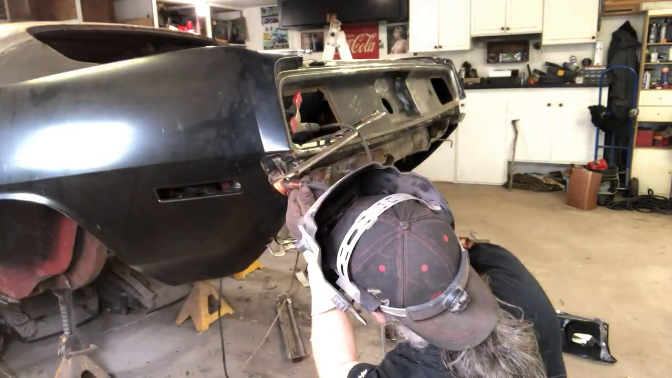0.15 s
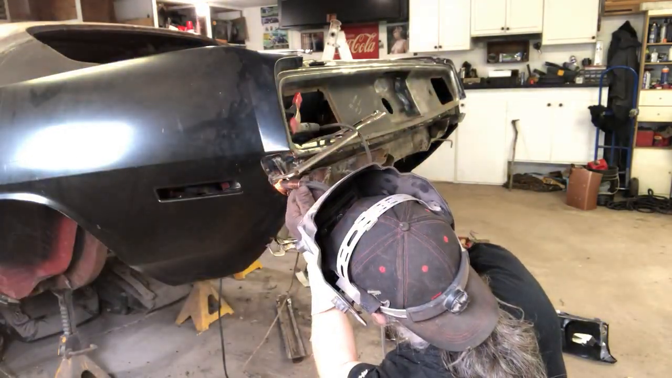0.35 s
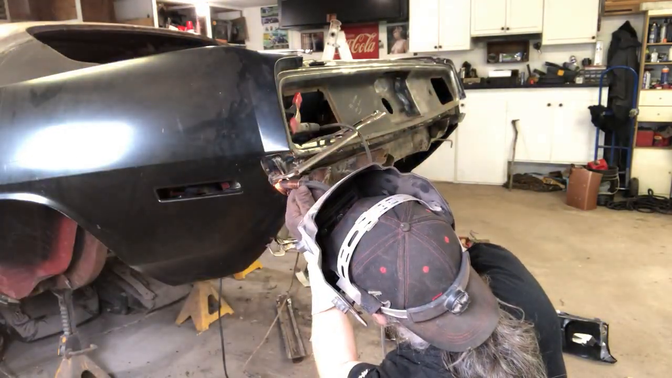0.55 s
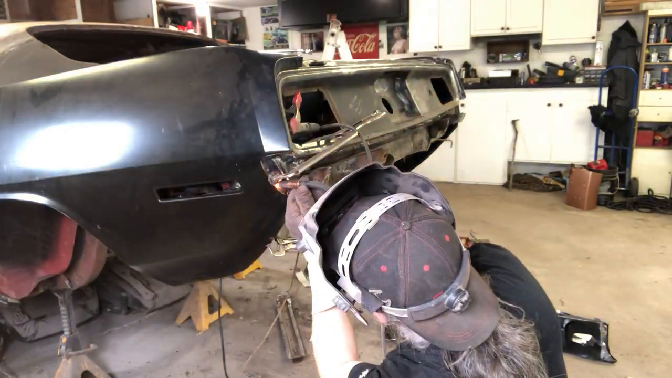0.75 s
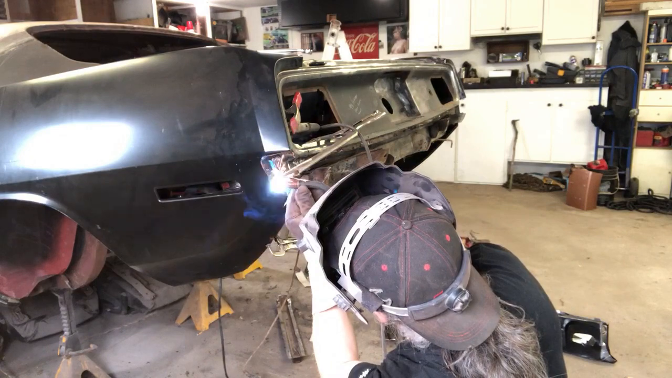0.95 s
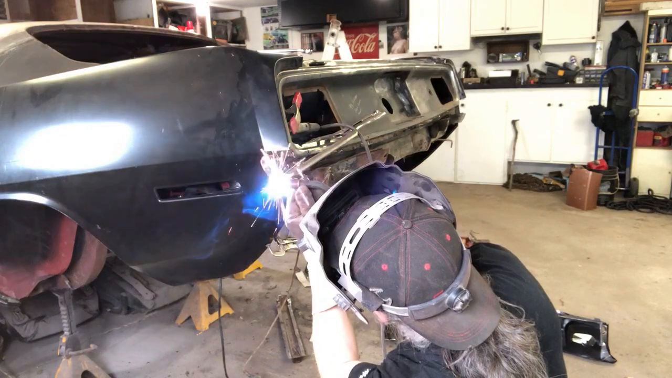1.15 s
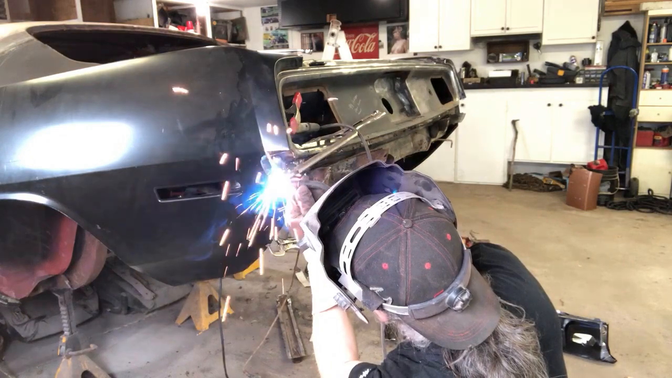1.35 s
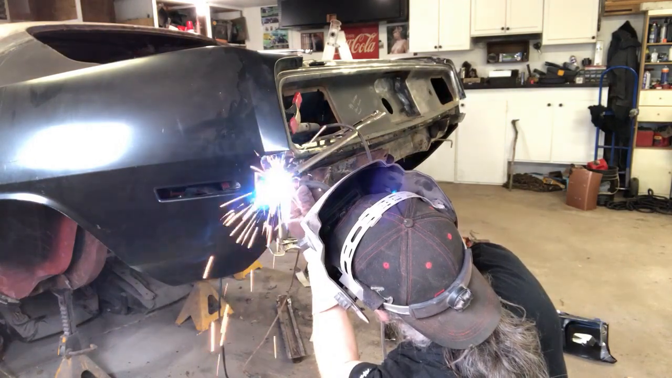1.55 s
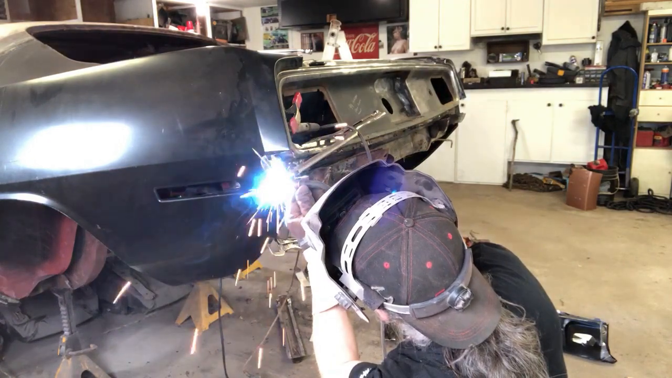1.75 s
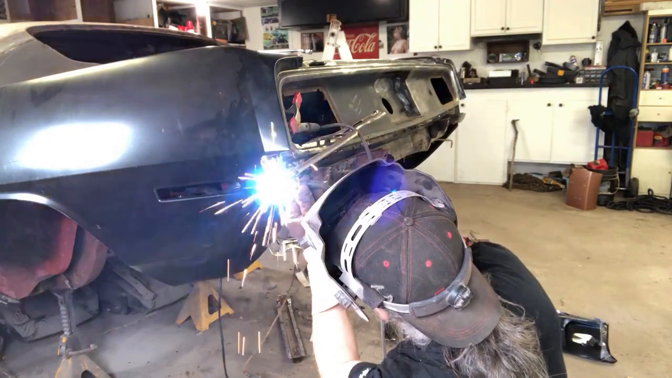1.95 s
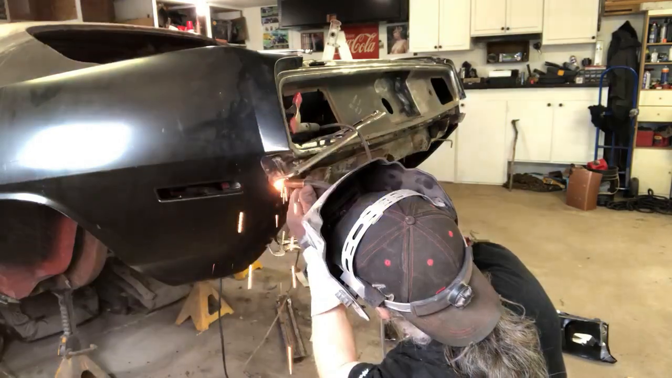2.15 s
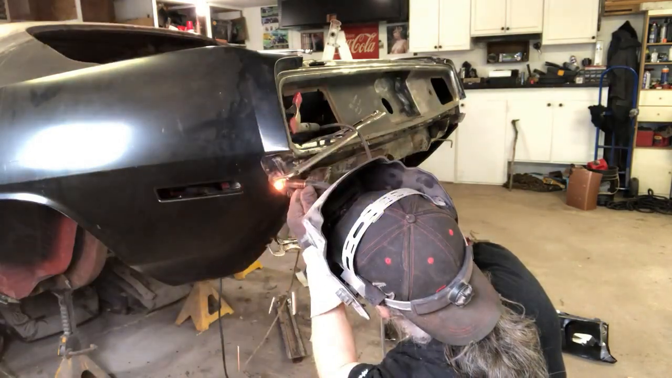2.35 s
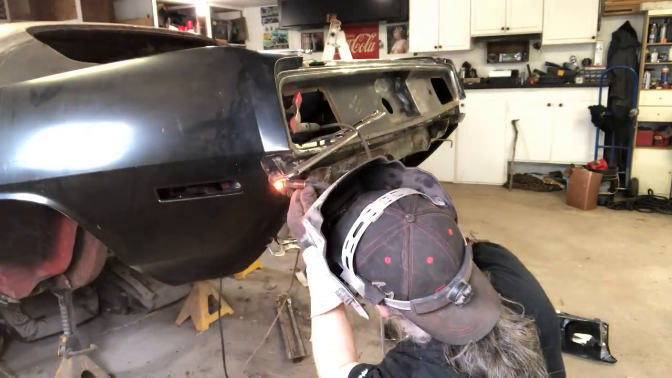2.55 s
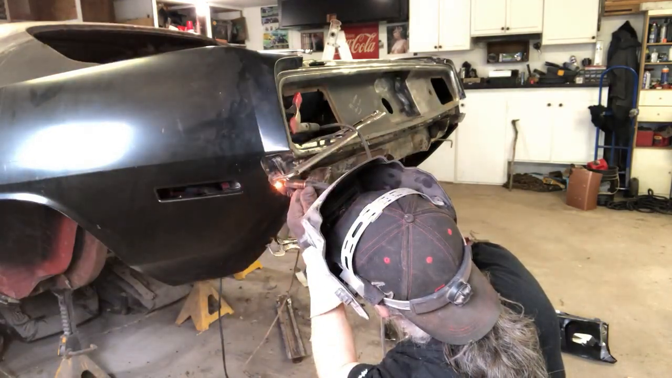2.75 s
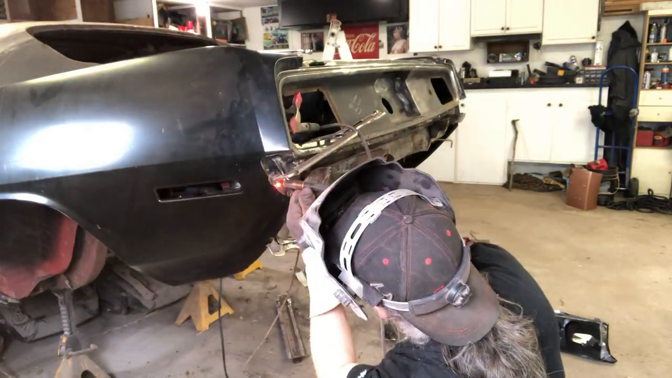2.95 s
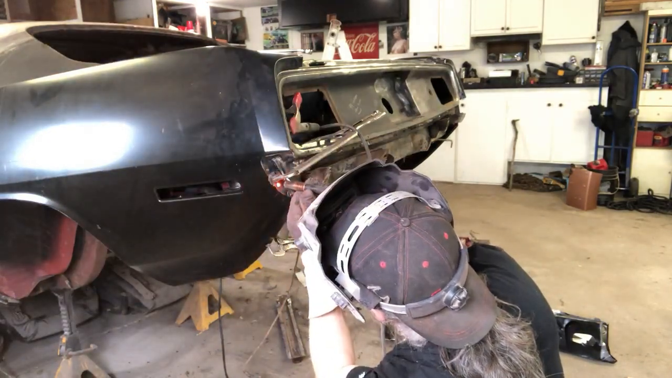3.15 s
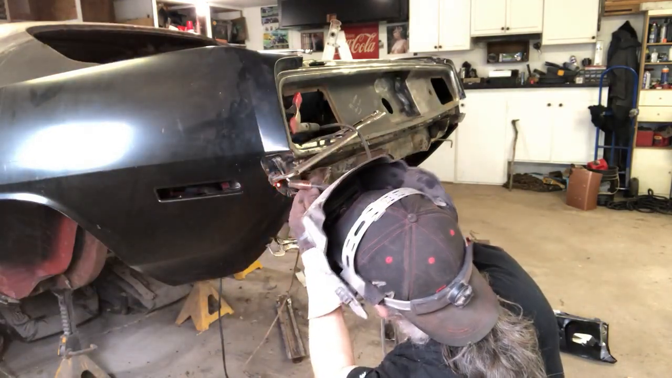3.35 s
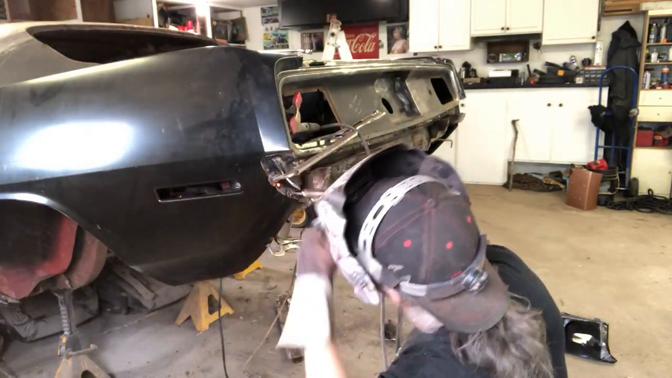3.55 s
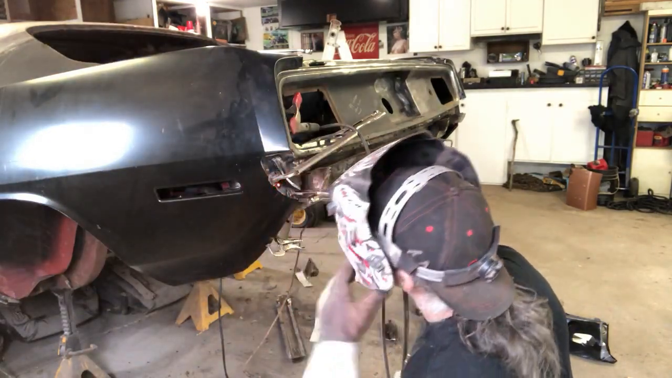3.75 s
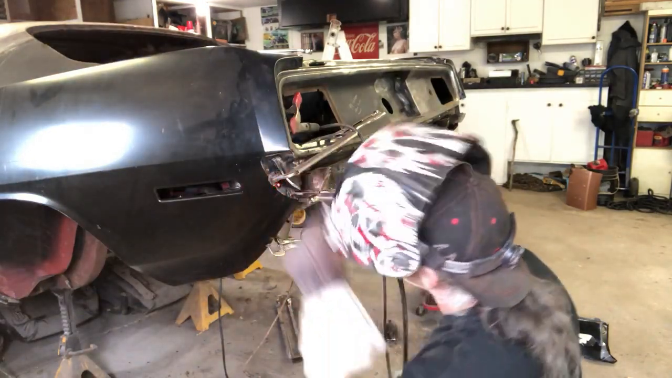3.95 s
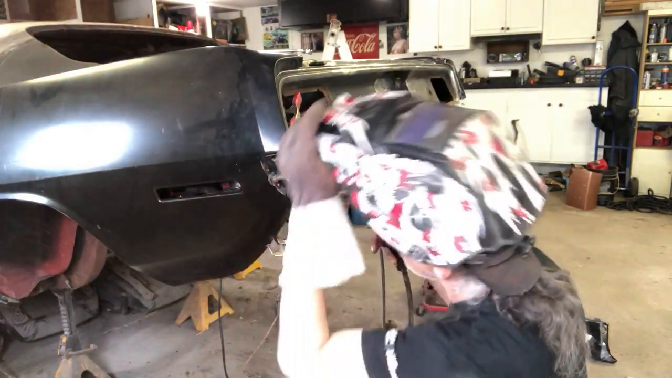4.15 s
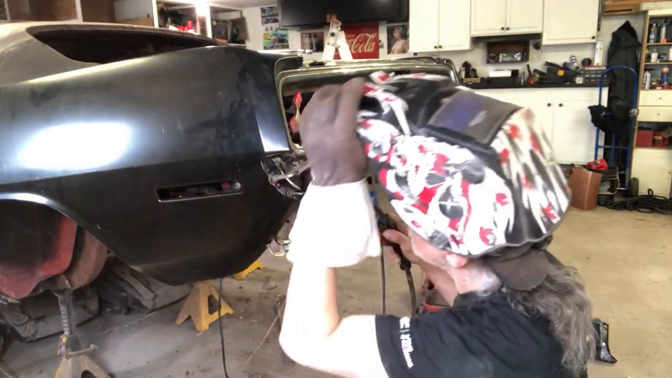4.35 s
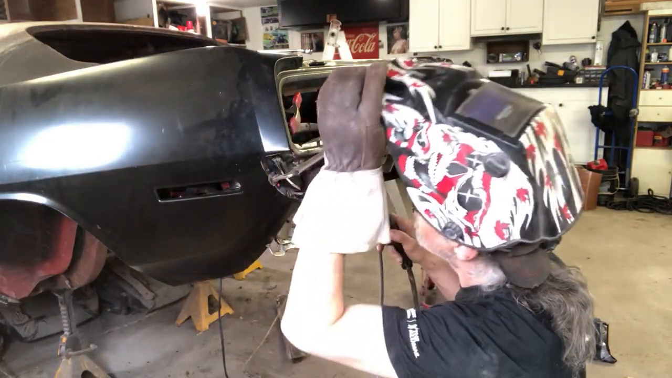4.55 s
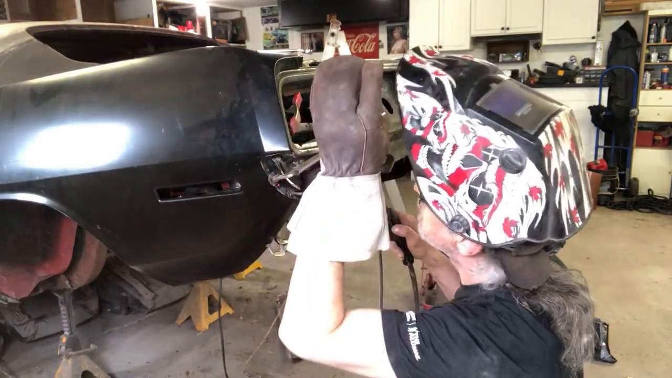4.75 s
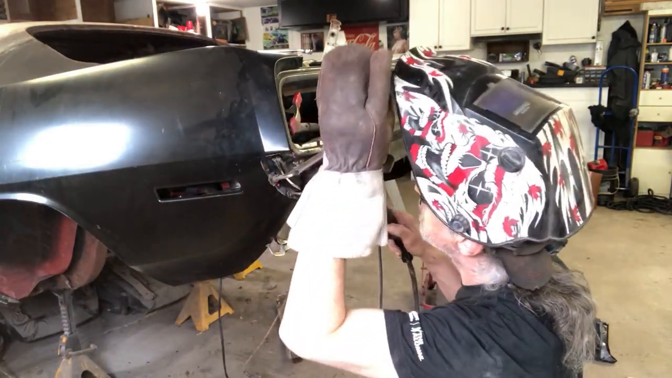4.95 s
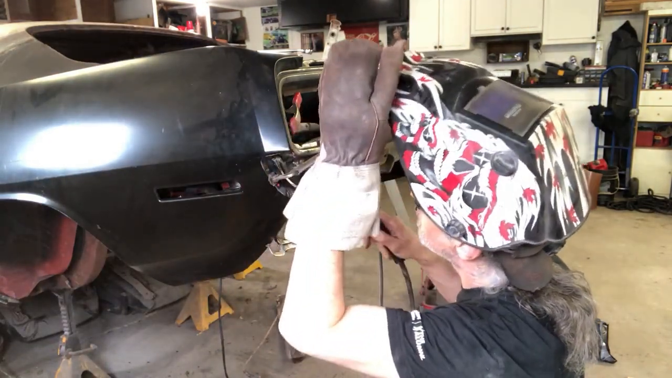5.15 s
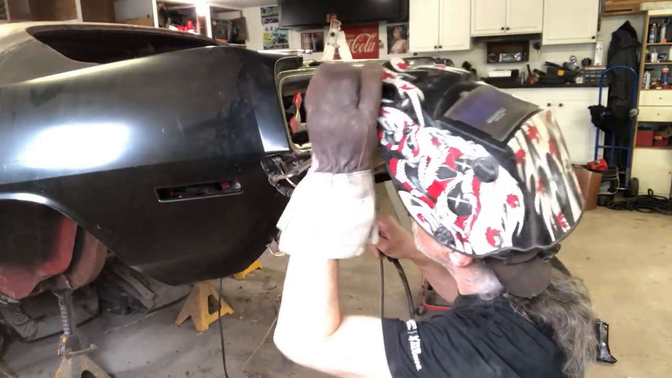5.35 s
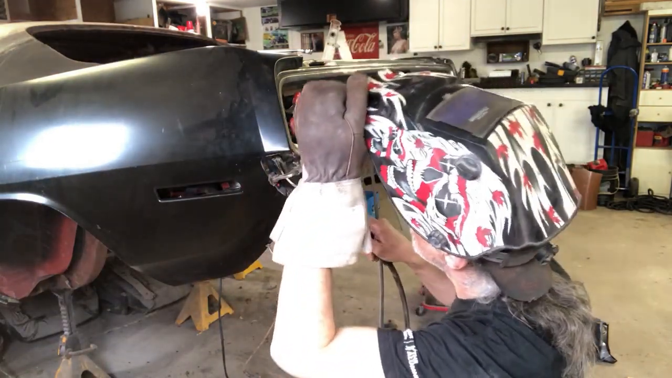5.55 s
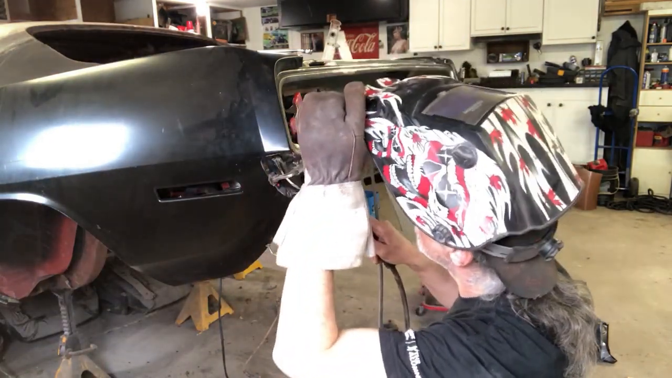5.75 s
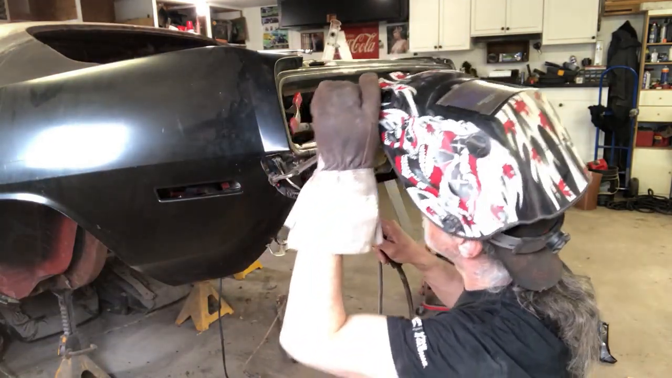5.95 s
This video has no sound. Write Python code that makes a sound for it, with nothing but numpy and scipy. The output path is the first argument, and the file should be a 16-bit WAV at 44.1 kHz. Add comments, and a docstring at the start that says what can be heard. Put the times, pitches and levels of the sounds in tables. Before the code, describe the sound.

A cooling fan hums quietly and steadily in a garage throughout, with a soft rush of air. At about 0.9 seconds a short puff of gas and the thin hiss of feeding wire start a weld on a steel car panel. From 1 second the arc stutters with a few sharp snaps, then breaks into loud, rapid, bright crackling in short, uneven runs. The cracks ring slightly in the sheet metal and echo briefly in the room, with sizzling, a throaty sputter and a faint, wavering low hum underneath. The welding stops just after 2 seconds and the fan is left alone. Between about 3.6 and 4.2 seconds come a few soft, hollow plastic knocks and scuffs as the welding helmet is pushed up, with a very faint rub near 4.5 seconds. The fan hums on until the end, near 6 seconds.

```python
"""A cooling fan hums in a garage, where a MIG welder lays one short bead on a car's steel panel.
Near 0.9 s the gas valve puffs, the wire feeds and a low, wavering hum sets in. The wire stutters on
the cold steel, then shorts and bursts in runs of some 50 to 90 cracks a second, with stutters between.
Each crack excites the modes of the panel and the room while the arc sizzles and the pool sputters.
The arc stops just after 2 s; near 4 s the welder sits up and pushes up his helmet."""
import sys
import numpy as np
from scipy import signal
from scipy.fft import rfft, irfft
from scipy.io import wavfile
from scipy.ndimage import uniform_filter1d, minimum_filter1d

SR = 44100
rng = np.random.default_rng(int(sys.argv[2]) if len(sys.argv) > 2 else 0)


def bounce(signal):
    """Save signal as a 16-bit WAV file at the path given by the first command-line argument."""
    frames = np.transpose(np.atleast_2d(signal))
    limited = np.clip(frames, -1, 1)
    pcm = np.round(limited * 32767).astype(np.int16)
    wavfile.write(sys.argv[1], SR, pcm)


N = 264585
T = np.arange(N) / SR
TRIGGER_S, STRIKE_S, HOT_S, STOP_S = .932, 1.013, 1.15, 2.064  # gas on, arc on, steel hot, trigger let go
BURST_DB = -4.3  # mean pressure kick in a steady run

# fan blade and motor tones: f/Hz, level/dB, gain once the welder sits up out of their path/dB
FAN_TONES = [(215.3, -55, 0), (247.6, -45.8, 0), (495.3, -56.5, -1), (543.7, -64, 0), (656.8, -69, 0),
             (742.9, -66, 7), (882.9, -70, 0), (990.5, -65, -4), (1238, -65.2, 0), (1437, -74, 0),
             (1733, -79, 0), (1981, -83, 0)]
# spectrum of the air rushing through the fan: f/Hz, level/dB
FAN_AIR_SPECTRUM = [(25, -35.5), (45, -18), (55, -16), (110, -9.5), (290, -4.5), (430, -12.5), (700, -9.5),
                    (1250, -15), (1550, -23.5), (2100, -29), (2700, -30), (3400, -34), (4700, -36),
                    (7000, -43), (15500, -54)]
# resonances of the machine's case: f/Hz, width/Hz, level/dB
CASE_MODES = [(157.8, 11, -57), (193.6, 25, -51), (215, 21, -49), (375, 18, -65.5), (677, 39, -65.5),
              (917, 17, -68)]
# spectrum of the gas jet: f/Hz, level/dB
GAS_SPECTRUM = [(300, 1), (1000, 10.5), (1600, 5.5), (2300, 7), (3300, 3.5), (4000, -6), (6500, -9),
                (9500, 2.5), (12000, -3), (15500, -14)]
# spectrum of the scraping wire: f/Hz, level/dB
FEED_SPECTRUM = [(1000, -25), (3500, -11.5), (5200, 1), (6800, 0), (8000, -15), (15500, -26)]
# spectrum of the garage's reverberation: f/Hz, level/dB
ROOM_SPECTRUM = [(60, -12), (118, -9), (155, 6), (350, -3.5), (600, -2.5), (800, -4), (1200, .5),
                 (1550, -2.5), (1750, -6.5), (1900, -2), (2060, -9), (2280, -1), (2450, -4.5), (2720, -2),
                 (2960, -6.5), (3250, -.5), (3600, -4), (3900, -2.5), (4200, -6), (4500, -1), (4720, -6),
                 (5080, .5), (5400, -2.5), (6200, -2), (7100, -3), (7700, -.5), (8250, -2), (8800, -1),
                 (9500, -7), (12000, -3.5), (13000, -7.5), (15000, -7.5)]
# its reverberation time: f/Hz, T60/s
ROOM_DECAY = [(200, .6), (2000, .78), (4500, .53), (6000, .49), (8500, .29), (14000, .23)]
# swells and dips of the low hum: t/s, level/dB
HUM_CONTOUR = [(.97, -64.5), (1.09, -50), (1.18, -62), (1.27, -52), (1.34, -62), (1.47, -54), (1.63, -49),
               (1.7, -69), (1.89, -48), (1.99, -59.5), (2.1, -51), (2.21, -58), (2.35, -76)]
# irregular kicks as the wire stubs, first on cold steel, then between runs: t/s, level/dB
STUBS = [(1.0139, -4.5), (1.0758, -7.3), (1.138, -9.8), (1.3941, -4), (1.4002, -6), (1.4123, -5),
         (1.4183, -3), (1.4808, -10), (1.6116, -8), (1.6235, -10), (1.6303, -7), (1.6912, -5), (1.702, -6),
         (1.7218, -5), (1.7293, -11), (1.7434, -4), (1.7518, -7), (1.8427, -4), (1.857, -4), (1.9383, -10),
         (1.9568, -4), (1.9751, -9)]
# steady runs, slower as the pool heats up: first t/s, last t/s, number of bursts
STEADY_RUNS = [(1.1548, 1.2324, 8), (1.246, 1.3188, 6), (1.3339, 1.3811, 4), (1.431, 1.464, 3),
               (1.4978, 1.6038, 7), (1.6478, 1.6836, 3), (1.7707, 1.8268, 4), (1.865, 1.918, 4),
               (1.9895, 2.0568, 5)]
# spectrum of a crack's direct sound: f/Hz, level/dB
CRACK_SPECTRUM = [(100, -28), (450, -24), (1300, -13), (2000, -18), (2800, -11), (3900, -2.2), (5300, 0),
                  (6000, -2.5), (6800, .3), (7600, -6), (8300, -13), (9000, -5.5), (9700, -8.5),
                  (11000, -7), (12900, -21), (13600, -15), (15500, -16)]
# echoes from near surfaces: delay t/ms, level/dB, centre f/Hz, width of each filter pass/Hz
REFLECTIONS = [(1.7, -13, 4800, 3000), (2.4, -4, 1000, 900), (3.7, -6, 8000, 1400), (4.0, -8, 14500, 4000),
               (4.9, -8, 14000, 4000), (5.0, -14, 3800, 2600), (5.2, -4, 8400, 1200),
               (7.7, -18, 5800, 12000), (10.8, -19, 5000, 5000), (12.4, -18, 5500, 7000)]
# modes of the steel panel: f/Hz, T60/s, relative level/dB
PANEL_MODES = [(1060, .08, -4), (1170, .12, 1), (1540, .3, -1), (1610, .12, -5), (1900, .12, -6),
               (2729, .3, .5), (3090, .3, -3), (3252, .2, -2), (3467, .2, -4), (3747, .3, -3),
               (3892, .18, 2.5), (4005, .3, -2), (4156, .3, -4), (4400, .12, -3), (4500, .2, -1),
               (4554, .3, -1), (4818, .25, -2), (5080, .08, 7), (5389, .2, -2), (5642, .25, 0),
               (5749, .25, -2), (5911, .3, -2), (6675, .15, 1), (7709, .15, -4), (8436, .12, -5),
               (8818, .08, -2)]
# slight stereo width in the treble during the crackling: f/Hz, level/dB
SIDE_SPECTRUM = [(4800, -70), (5300, 2), (8000, -3), (10500, 0), (13000, -5)]
# surges of the molten pool: centre t/s, half length/s, level/dB
POOL_SURGES = [(1.034, 0.0066, -43), (1.087, .02, -39), (1.224, 0.016, -36), (1.573, 0.016, -35),
               (1.7, 0.2, -43.5), (2.051, 0.016, -40.5)]
# spectrum of its sputter: f/Hz, level/dB
POOL_SPECTRUM = [(100, -10.5), (140, 0), (300, -5.5), (430, -1), (620, 0.5), (850, -5), (1180, 1.5),
                 (1600, -5.5), (2000, -11), (5000, -24.5), (15500, -38)]
# knocks of torch and helmet: t/s, level/dB, decay/s, relative thud level/dB, relative tick level/dB
GEAR_KNOCKS = [(3.592, -63.5, .015, -12, -5), (3.913, -54, .018, 15, -30), (3.979, -59.5, .015, 9, -24),
               (4.145, -66, .028, -5, -14)]
# spectrum of their tick: f/Hz, level/dB
TICK_SPECTRUM = [(1500, -20), (4500, -2), (7500, 0), (11000, -5), (15500, -18)]
# rubs of glove and headband: centre t/s, half length/s, level/dB
GEAR_RUBS = [(4.04, .07, -66), (4.145, .05, -62.5), (4.5, .2, -72)]
# spectrum of a scuff: f/Hz, level/dB
SCUFF_SPECTRUM = [(300, 3.5), (1200, 6), (3500, -1.5), (6000, -10.5), (11000, -19), (15500, -26)]


def undb(db):
    """Amplitude ratio of a level in decibels."""
    return 10 ** (np.asarray(db) / 20)


def level(x, db=0):
    """Normalisation to an rms level."""
    return x * undb(db) / np.sqrt(np.mean(x ** 2))


def unit_energy(response):
    """Normalisation to a total energy of 1."""
    return response / np.sqrt(np.sum(response ** 2))


def over_pitch(rows, hz):
    """Interpolation of (f/Hz, value) rows on a logarithmic frequency axis."""
    f, value = np.transpose(rows)
    return np.interp(np.log(np.maximum(hz, 1)), np.log(f), value)


def tint(x, spectrum):
    """Zero-phase filtering by multiplication of spectra."""
    f = np.fft.rfftfreq(len(x), 1 / SR)
    return irfft(rfft(x) * undb(over_pitch(spectrum, f)), len(x))


def hiss(spectrum):
    """Spectrally shaped Gaussian noise, rms 1."""
    return level(tint(rng.standard_normal(N), spectrum))


def resonance(hz, width_hz):
    """Response of a steep-sided resonator to white noise, rms 1."""
    f = np.fft.rfftfreq(N, 1 / SR)
    return level(irfft(rfft(rng.standard_normal(N)) / (1 + ((f - hz) / width_hz) ** 2) ** 2, N))


def wander(rate_hz):
    """Linear interpolation between random values, rms 1."""
    hold = int(SR / rate_hz)
    steps = np.repeat(rng.standard_normal(N // hold + 1), hold)
    return level(uniform_filter1d(steps, hold)[:N])


def envelope(start, stop, attack_s, decay_s):
    """Linear attack from start, exponential decay from stop."""
    return np.clip((T - start) / attack_s, 0, 1) * np.exp(-np.maximum(T - stop, 0) / decay_s)


def swells(rows):
    """Superposition of Gaussian envelopes."""
    return sum(undb(db) * np.exp(-((T - s) / half_s) ** 2) for s, half_s, db in rows)


def kicks(times, sizes, length=N):
    """Impulse train with the given times and amplitudes."""
    return np.bincount(np.clip(np.round(times * SR).astype(int), 0, length - 1), sizes, length)


def through(x, response):
    """Convolution with an impulse response."""
    return signal.fftconvolve(x, response)[:N]


def fan(air_db=-50, drift=.0007, flutter_db=.74, sway_db=.3, sits_up_s=(4.0, 4.3)):
    """Rotation gives tones that drift together, turbulence gives noise, and the case resonates."""
    rotor_time = np.cumsum(1 + drift * wander(3)) / SR
    upright = np.interp(T, sits_up_s, (0, 1))
    tones = 0
    for hz, db, gained_db in FAN_TONES:
        tone = np.sin(2 * np.pi * (hz * rotor_time + rng.random())) * undb(flutter_db * wander(3))
        tones += level(tone, db) * undb(gained_db * upright)
    boom = sum(undb(db) * resonance(hz, width) for hz, width, db in CASE_MODES)
    air = undb(air_db + sway_db * wander(5)) * hiss(FAN_AIR_SPECTRUM)
    return tones + boom + air


def gas_jet(puff_db=-39, flow_db=-66, valve_s=.0027, hold_s=.009):
    """Jet noise at the nozzle: stored pressure escapes in a puff, then the flow is even."""
    puff = undb(puff_db) * envelope(TRIGGER_S, TRIGGER_S + hold_s, valve_s, decay_s=.0069)
    flow = undb(flow_db) * envelope(TRIGGER_S, STOP_S, valve_s, decay_s=.01)
    return hiss(GAS_SPECTRUM) * (puff + flow)


def wire_feed(db=-50.5, flicker_db=1.6):
    """Sliding friction of the wire in the torch tip grows as its motor comes up to speed."""
    speed = envelope(TRIGGER_S, STOP_S, attack_s=.027, decay_s=.01)
    return speed * undb(db + flicker_db * wander(69)) * hiss(FEED_SPECTRUM)


def garage(build_s=.01, size=32768, bands=14):
    """Impulse response of a diffuse field: it builds up, then decays exponentially, treble first."""
    t, f = np.arange(size) / SR, np.fft.rfftfreq(size, 1 / SR)
    noise = rfft(rng.standard_normal(size)) * undb(over_pitch(ROOM_SPECTRUM, f))
    centres = np.geomspace(100, 16000, bands)
    tail = 0
    for hz, share in zip(centres, np.eye(bands)):
        t60 = over_pitch(ROOM_DECAY, hz)
        band = irfft(noise * over_pitch(np.c_[centres, share], f))
        tail += band * undb(-60 * t / t60) / np.sqrt(t60)
    return unit_energy(tail * (1 - np.exp(-(t / build_s) ** 2)))


def in_garage(direct, wet_db):
    """Superposition of the direct and the reverberant field."""
    return direct + undb(wet_db) * through(direct, garage())


def low_hum(hum_hz=58.3, waver_hz=.63):
    """Frequency and amplitude modulation: a low, wavering hum that swells and dips during the weld."""
    swell = undb(np.interp(T, *np.transpose(HUM_CONTOUR), left=-np.inf, right=-np.inf))
    phase = 2 * np.pi * np.cumsum(hum_hz + waver_hz * wander(8)) / SR
    return level(np.sin(phase)) * swell


def steady_bursts(jitter_s=.0002, scatter_db=.6):
    """Relaxation oscillation: the wire shorts and bursts at an even pace; rows of t/s, level/dB."""
    times = np.concatenate([np.linspace(first, last, count) for first, last, count in STEADY_RUNS])
    timing, size = rng.standard_normal((len(times), 2)).T
    return list(zip(times + jitter_s * timing, BURST_DB + scatter_db * size))


def arc(touch_db=-22, touch_lead_s=.0019, jitter_s=.00025, split_s=.0004, split_db=-17):
    """Impulsive excitation: the wire touches the hot pool, then its molten bridge parts in two snaps."""
    times, db = np.transpose(STUBS + steady_bursts())
    timing, second_size = rng.standard_normal((len(times), 2)).T
    touches = kicks(times - touch_lead_s + jitter_s * timing, undb(touch_db) * (times > HOT_S))
    first_snaps = kicks(times, undb(db))
    gaps = split_s * rng.uniform(.2, 1, len(times))  # interference colours each burst differently
    second_snaps = kicks(times + gaps, undb(db + split_db) * second_size)
    return touches + first_snaps + second_snaps + spatter() + spits(times, db)


def spatter(rate_hz=1500, db=-55, cold_db=12, cold_fade_s=.04, flicker_db=3, edge_s=.003):
    """Shot noise of fine droplets, louder after each stub on cold steel."""
    drops = (rng.random(N) < rate_hz / SR) * rng.standard_normal(N)
    cold = sum(envelope(s, s, edge_s, cold_fade_s) for s, _ in STUBS if s < HOT_S)
    burning = envelope(STRIKE_S, STOP_S, edge_s, edge_s)
    return level(drops, db) * burning * undb(cold_db * cold + flicker_db * wander(120))


def spits(times, burst_db, gain_db=-46, lead_s=.0007, width_s=.0019):
    """Fragmentation noise: the weaker a burst, the more the bridge tears in pieces and spits."""
    weakness = kicks(times - lead_s, np.maximum(BURST_DB - burst_db, 0))
    tearing = signal.fftconvolve(weakness, signal.windows.gaussian(513, width_s * SR), "same")
    return undb(gain_db) * tearing * rng.standard_normal(N)


def crack_pulse(size=1024, dispersion_hz=4500):
    """A minimum-phase pulse, dispersed so that its treble leads its body; envelope peak 1."""
    f = np.fft.rfftfreq(size, 1 / SR)
    cepstrum = irfft(np.log(undb(over_pitch(CRACK_SPECTRUM, f))))
    cepstrum[1:size // 2] *= 2  # folding the cepstrum gives minimum phase
    cepstrum[size // 2 + 1:] = 0
    compact = irfft(np.exp(rfft(cepstrum)))
    _, poles = signal.iirpeak(dispersion_hz, Q=1.5, fs=SR)
    pulse = signal.lfilter(poles[::-1], poles, compact)  # all-pass
    return pulse / np.abs(signal.hilbert(pulse)).max()


def panel(size=32768):
    """Impulse response of the steel sheet: a sum of exponentially damped normal modes."""
    t = np.arange(size) / SR
    modes = (undb(db - 60 * t / t60) / np.sqrt(t60) * np.sin(2 * np.pi * hz * t)
             for hz, t60, db in PANEL_MODES)
    return unit_energy(sum(modes))


def near_surfaces(size=1024):
    """Early reflections: each surface returns a delayed, band-limited copy of an impulse."""
    response = 0
    for ms, db, hz, width in REFLECTIONS:
        b, a = signal.iirpeak(hz, hz / width, fs=SR)
        echo = kicks(np.array([ms / 1000]), undb([db]), size)
        response += signal.lfilter(b, a, signal.lfilter(b, a, echo))
    return response


def directed_reverb(excitation, swing_rad=.7):
    """Directivity: each burst radiates its own way and excites its own blend of the room's paths."""
    aim = swing_rad * wander(60)
    return through(excitation * np.cos(aim), garage()) + through(excitation * np.sin(aim), garage())


def weld(excitation, direct_db=-.8, panel_db=-11.5, room_db=-8.3, side_samples=2048):
    """Multipath propagation of the arc's kicks: direct, reflected, via panel and room; mid and side."""
    crack = crack_pulse()
    strength = np.linalg.norm(crack)
    direct = through(excitation, crack)
    echoes = through(direct, near_surfaces())
    polarity = np.sign(wander(200))  # a burst may push the sheet either way
    ring = undb(panel_db) * strength * through(excitation * polarity, panel())
    room = undb(room_db) * strength * directed_reverb(excitation)
    side = undb(room_db) * strength * through(excitation, garage()[:side_samples])
    return undb(direct_db) * direct + echoes + ring + room, tint(side, SIDE_SPECTRUM)


def pool(flicker_db=1):
    """The molten pool sputters: low, throaty noise, amplitude-modulated in surges."""
    return hiss(POOL_SPECTRUM) * swells(POOL_SURGES) * undb(flicker_db * wander(150))


def helmet(shell_hz=550, contact_s=.0036, roughness_db=1.4):
    """Soft impacts excite the hollow resonance of the plastic shell; friction adds uneven rubbing."""
    scuff, shell = hiss(SCUFF_SPECTRUM), resonance(shell_hz, width_hz=110)
    rubbing = scuff * swells(GEAR_RUBS) * undb(roughness_db * wander(70))
    tick = hiss(TICK_SPECTRUM)
    knocks = 0
    for s, db, decay_s, thud_db, tick_db in GEAR_KNOCKS:
        timbre = scuff + undb(thud_db) * shell + undb(tick_db) * tick
        knocks += undb(db) * envelope(s, s + contact_s, contact_s, decay_s) * timbre
    return rubbing + knocks


def scene():
    """Superposition in the centre, with slight stereo width in the treble during the crackling."""
    cracks, side = weld(arc())
    sputter = in_garage(pool(), wet_db=-3)
    torch = in_garage(gas_jet() + wire_feed(), wet_db=-9)
    mid = cracks + sputter + torch + low_hum() + fan() + helmet()
    return np.array([mid + side, mid - side])


def record(dry, ceiling=.68, window_samples=45, cutoff_hz=15600):
    """Peak limiting holds the cracks down; an elliptic low-pass then removes the top of the treble."""
    needed_gain = ceiling / np.maximum(np.abs(dry).max(axis=0), ceiling)
    gain = uniform_filter1d(minimum_filter1d(needed_gain, window_samples), window_samples)
    lowpass = signal.ellip(7, .1, 60, cutoff_hz, fs=SR, output="sos")
    return signal.sosfilt(lowpass, dry * gain)


dry = scene()
out = record(dry)
bounce(out)
```